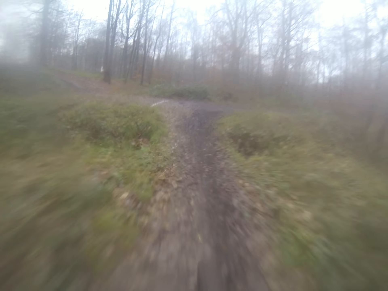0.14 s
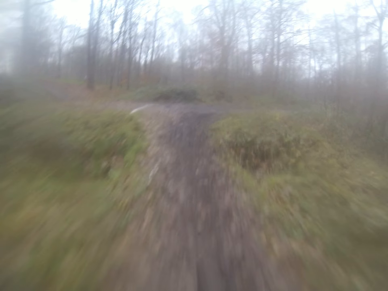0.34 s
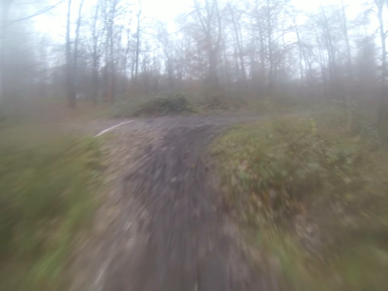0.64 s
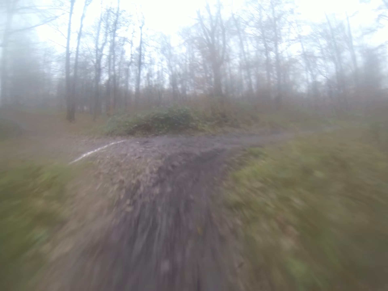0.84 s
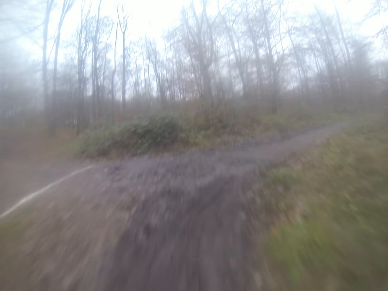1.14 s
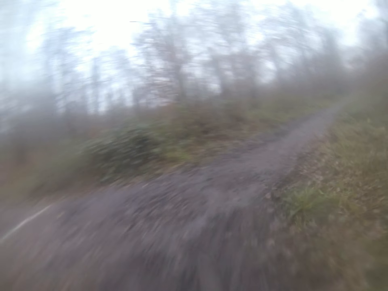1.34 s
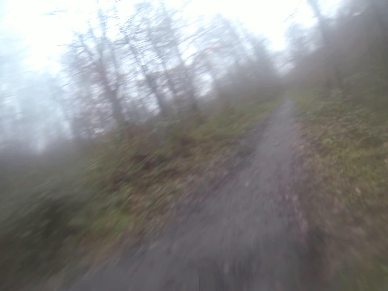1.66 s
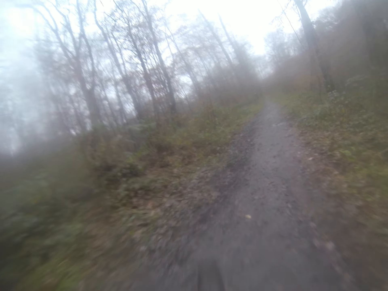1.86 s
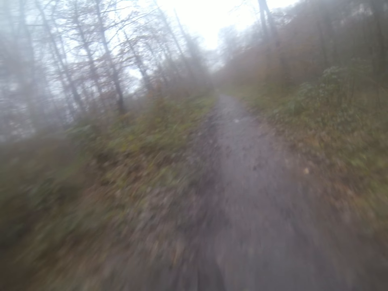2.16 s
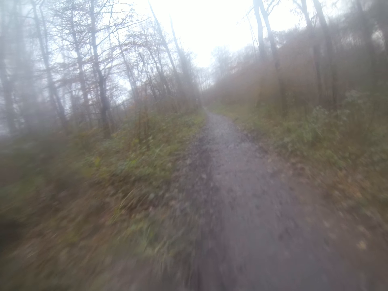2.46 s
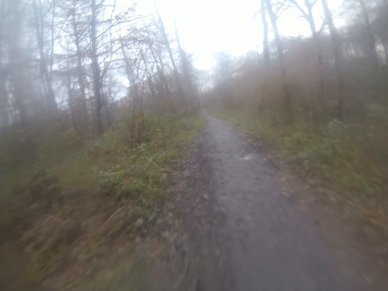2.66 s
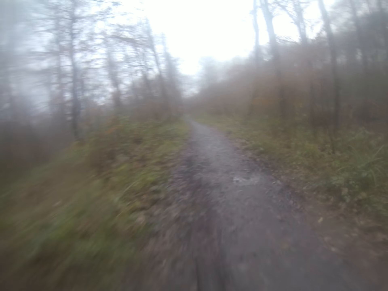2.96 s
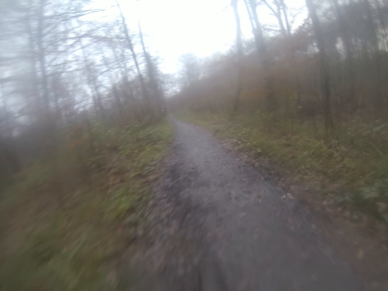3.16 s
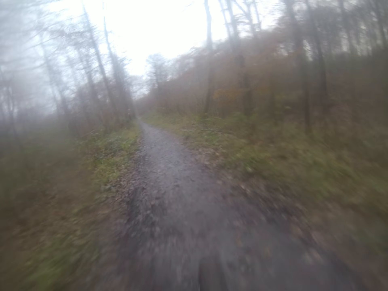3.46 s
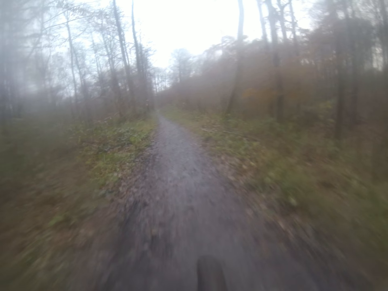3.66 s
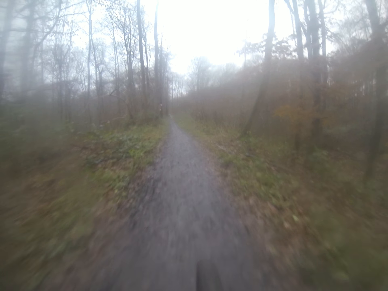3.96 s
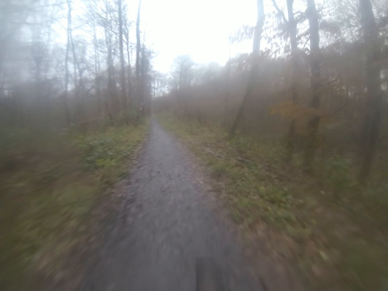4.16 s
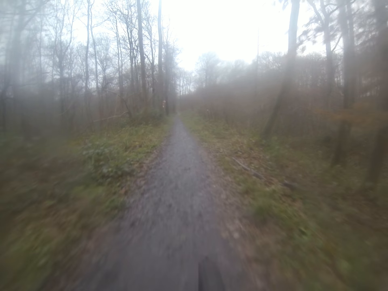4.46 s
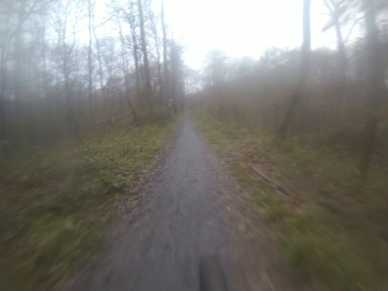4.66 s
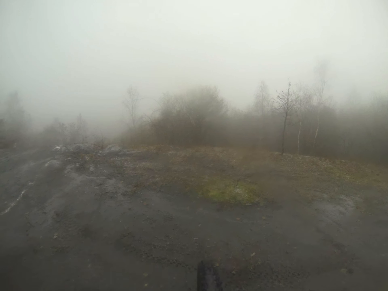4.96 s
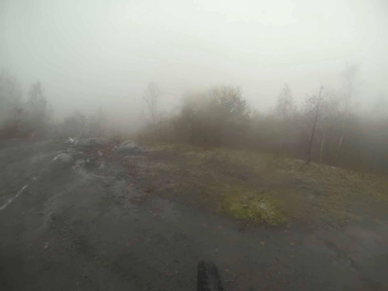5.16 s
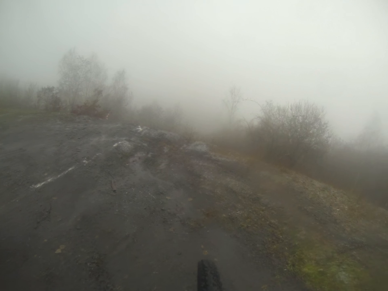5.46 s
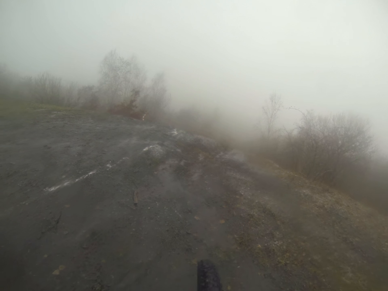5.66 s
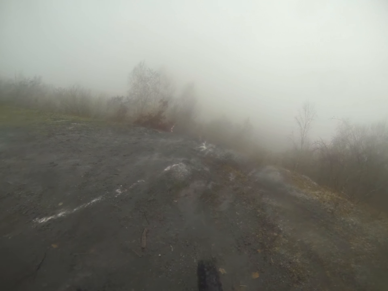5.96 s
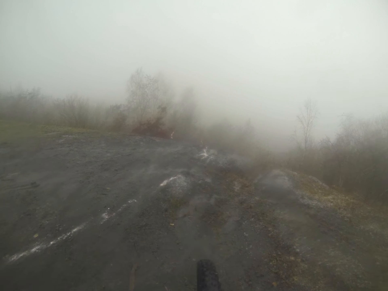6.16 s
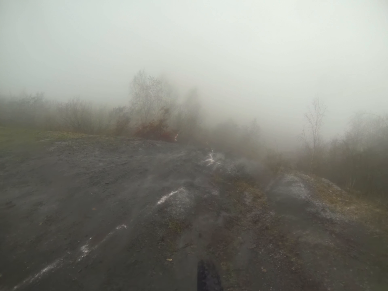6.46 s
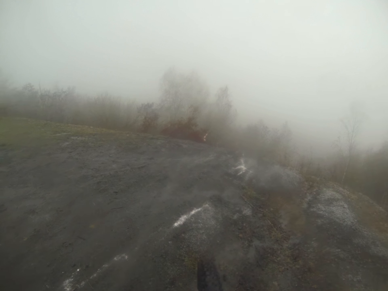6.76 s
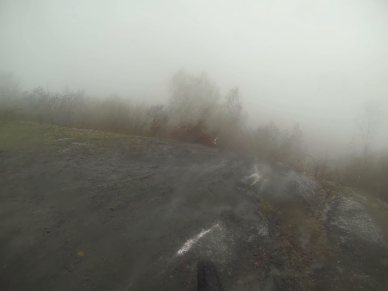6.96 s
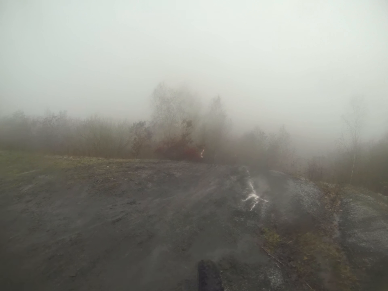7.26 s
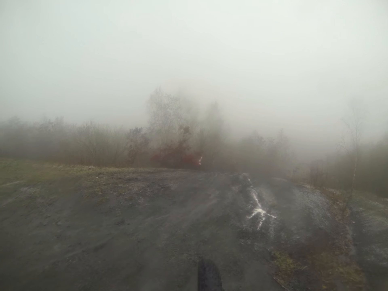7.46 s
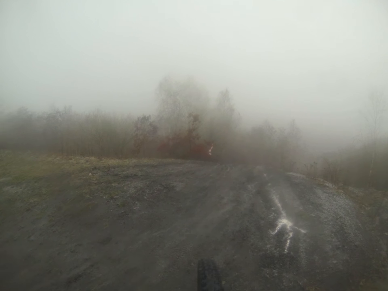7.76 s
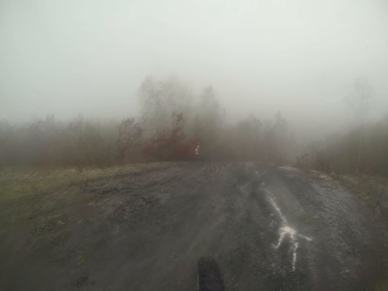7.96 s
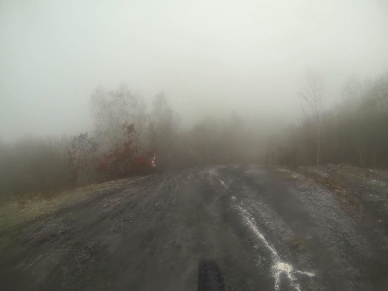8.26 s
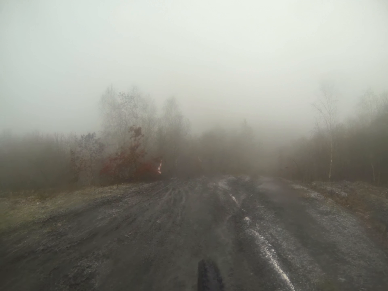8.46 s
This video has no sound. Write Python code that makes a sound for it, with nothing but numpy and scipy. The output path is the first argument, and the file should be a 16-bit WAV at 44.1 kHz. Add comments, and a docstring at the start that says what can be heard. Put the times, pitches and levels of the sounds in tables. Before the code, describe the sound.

The microphone sits in a case on a mountain bike, so everything is close, boxy and muffled. From 0 to 5 s, wind buffeting and ground shake make a thick, uneven low rumble that surges in dips and thins over crests. Irregular hollow thuds, chain clacks and tiny stone pings ride on it, over soft tyre crunch and ticking grit; a strong clack comes near 4.15 s. At 5.06 s there is a blink of silence, then from 5.1 to 5.5 s a loud wet disc brake squeal, harsh and rich in overtones, with a nearly steady, slightly wavering pitch and scrape beneath. From 5.5 s the rumble is weaker; short gliding tread hums come around 5.5-5.8 and 6.3-6.7 s, with pad hiss and stony crunch. Rumble grows again; hard clacks and ringing brake grazes cluster around 7.1-7.6 s, and rattling continues to 8.6 s.

```python
"""A mountain bike runs over a wet forest track, heard by a microphone in a case on the bike.
From the start wind and ground shake rumble as filtered noise; tyres crunch and flung grit ticks as
filtered impulses; bumps, chain clacks and stones ring damped case modes. At 5.06 s comes a blink of
silence, then a wet disc brake squeals as a stack of partials. From 5.45 s the pads hiss and graze
as noise and the tread hums as gliding tones, while the bike rattles on."""
import sys
import numpy as np
from scipy import signal
from scipy.fft import rfft, irfft, next_fast_len
from scipy.io import wavfile
from scipy.ndimage import uniform_filter1d, map_coordinates

SR = 44100
rng = np.random.default_rng(int(sys.argv[2]) if len(sys.argv) > 2 else 0)


def put_to_file(sound):
    """Save the sound as 16-bit audio at rate SR, in the file named by the first command-line argument."""
    columns = np.atleast_2d(sound).T  # one column per channel
    safe = np.clip(columns, -1, 1)
    whole_steps = np.round(safe * 32767)
    wavfile.write(sys.argv[1], SR, whole_steps.astype(np.int16))


N = 380141
TIME_S = np.arange(N) / SR
SILENCE_START_S, SILENCE_END_S = 5.062, 5.094


def amp(db):
    """Decibels to gain."""
    return 10 ** (np.asarray(db) / 20)


def unit(x):
    """x at rms 1."""
    return x / np.sqrt(np.mean(x ** 2) + 1e-20)


def curves(rows):
    """One value per sample for each column after the time."""
    knot_s, *columns = np.transpose(rows)
    return [np.interp(TIME_S, knot_s, column) for column in columns]


def during(rows):
    """1 while a curve lasts and 0 outside, with soft edges."""
    inside = (TIME_S > rows[0][0]) & (TIME_S < rows[-1][0])
    return uniform_filter1d(1.0 * inside, size=128)


def hump(middle_s, length_s):
    """A smooth rise from 0 to 1 and back."""
    return np.cos(np.pi * np.clip((TIME_S - middle_s) / length_s, -.5, .5)) ** 2


def swell(t, rise_s):
    """A rise to 1 at rise_s, then a decay."""
    return t / rise_s * np.exp(1 - t / rise_s)


def along(points, hz):
    """(Hz, value) points read on a log axis."""
    f, value = np.transpose(points)
    return np.interp(np.log(hz), np.log(f), value)


def wobble(rate_hz):
    """A smooth random curve, rate_hz knots a second."""
    knots = rng.standard_normal(int(N * rate_hz / SR) + 4)
    return map_coordinates(knots, [np.arange(N) * rate_hz / SR])


def coloured(x, spectrum):
    """x through a causal minimum-phase filter with the given (Hz, dB) points, at rms 1."""
    size = 2 * next_fast_len(N // 2 + 8192)
    hz, db = np.transpose(spectrum)
    log_bins = np.log(np.fft.rfftfreq(size, 1 / SR) + 1)
    gain = amp(np.interp(log_bins, np.log(hz), db))
    # folding the cepstrum onto positive time makes the filter causal
    cepstrum = irfft(np.log(gain))[:size // 2]
    cepstrum[0] /= 2
    response = np.exp(rfft(2 * cepstrum, size))
    return unit(irfft(rfft(x, size) * response)[:N])


def noise(spectrum):
    """Coloured noise of rms 1."""
    return coloured(rng.standard_normal(N), spectrum)


def steady(x, seconds):
    """x without its swells slower than the given time."""
    window = signal.windows.hann(int(seconds * SR) + 3)
    power = np.abs(signal.fftconvolve(x ** 2, window / window.sum(), "same"))
    return x / np.sqrt(power + 1e-6)


def grains(rate_hz, spread_db):
    """Random impulses of uneven size, rate_hz a second on average, at rms 1."""
    hit = rng.random(N) < rate_hz / SR
    size = amp(spread_db * np.minimum(rng.exponential(size=N), 4))
    return unit(hit * size * np.sign(rng.standard_normal(N)))


def ticks(rate_hz, range_db):
    """Sparse impulses whose sizes spread over range_db, small ones most common, at rms 1."""
    hit = rng.random(N) < rate_hz / SR
    size = amp(-range_db * np.sqrt(rng.random(N)))
    return unit(hit * size * np.sign(rng.standard_normal(N)))


# dips press the bike down (+), crests let it go light (-): middle t/s, length/s, load/dB
LOAD_SWINGS = [(0.192, .11, -9.5), (0.563, 0.072, 7), (1.263, .07, 12), (1.312, 0.17, -12),
               (1.753, 0.05, -13), (2.314, 0.086, 10), (2.529, 0.11, -10.5), (2.681, 0.036, 10.5),
               (2.797, 0.047, -1.5), (3.191, 0.062, 8.5), (3.261, 0.037, 9), (4.334, 0.1, 6.5),
               (6.755, 0.054, -4), (6.81, 0.098, 6), (7.267, 0.073, 7), (7.722, 0.2, -6.5),
               (8.403, 0.065, 7.5), (8.452, 0.15, -11)]
JOLT_DB, JOLT_S = 3, 0.037


def load():
    """Weight on the wheels in dB through dips, over crests and against bumps and stones."""
    swings_db = sum(db * hump(middle_s, length_s) for middle_s, length_s, db in LOAD_SWINGS)
    jolts = sum(hump(s, JOLT_S) for s, *_ in [*BUMPS, *STONES])
    return swings_db + JOLT_DB * (np.minimum(jolts, 1) - .1)


# wind on the case: t/s, base level/dB
WIND_LEVEL = [(0, -24), (.85, -17.5), (1.4, -24.5), (3.22, -23), (3.35, -36), (3.7, -20), (5.05, -25),
              (5.1, -34), (5.47, -30), (6.5, -20.5), (7.3, -15.5), (8.62, -15.5)]
# how hard the ground shakes the bike: t/s, base level/dB
GROUND_SHAKE = [(0, -16.5), (.7, -16), (1.1, -18.5), (2.3, -19), (2.75, -17.5), (3.0, -19), (3.26, -18.5),
                (3.33, -29), (3.5, -21.5), (3.74, -13.5), (4.15, -18), (5.01, -12), (5.06, -14.5),
                (5.1, -29), (5.47, -29.5), (5.6, -24.5), (6.15, -18), (7.4, -16.5), (7.75, -17.5),
                (8.62, -15)]
# wind rumble spectrum: f/Hz, relative level/dB
BUFFET_SPECTRUM = [(8, -17), (18, 12.5), (30, 9), (48, 9), (70, 1.5), (100, 2), (200, -73)]
# lower mount resonance: f/Hz, relative level/dB
BOOM_SPECTRUM = [(40, -15), (75, -10), (100, -2), (116, 3), (140, -6.5), (170, -20.5), (240, -32.5),
                 (500, -62.5), (2000, -110)]
# upper mount resonance: f/Hz, relative level/dB
DRONE_SPECTRUM = [(90, -34), (135, -1.5), (160, 0.5), (188, 1), (220, -8), (265, -15.5), (315, -18.5),
                  (370, -32.5), (460, -37.5), (900, -57.5), (2000, -100)]
WIND_DB_PER_LOAD_DB, BOOM_DB_PER_LOAD_DB, DRONE_DB_PER_LOAD_DB = .9, 1, 0.96
DRONE_DB_PER_SHAKE_DB = 1.175


def rumble(load_db):
    """Wind buffets the case while rough ground shakes it in the two resonances of its mount."""
    wind_db, = curves(WIND_LEVEL)
    shake_db, = curves(GROUND_SHAKE)
    shake_db = shake_db + 1.44 * wobble(22)
    buffet_db = wind_db + WIND_DB_PER_LOAD_DB * load_db + 2.5 * wobble(14) - 0.6
    boom_db = shake_db + BOOM_DB_PER_LOAD_DB * load_db + 1.7 * wobble(16) + 0.2
    drone_db = DRONE_DB_PER_SHAKE_DB * shake_db + DRONE_DB_PER_LOAD_DB * load_db
    drone_db = drone_db + 2.0 * wobble(24) - 4.0
    buffet = amp(buffet_db) * steady(noise(BUFFET_SPECTRUM), seconds=0.64)
    boom = amp(boom_db) * steady(noise(BOOM_SPECTRUM), seconds=0.22)
    drone = amp(drone_db) * steady(noise(DRONE_SPECTRUM), seconds=0.17)
    return buffet + boom + drone


# stones working under the tread: t/s, base level/dB
ROLL_LEVEL = [(0, -38.5), (.4, -51.5), (.75, -42.5), (1.1, -47.5), (2.5, -46), (3.4, -47), (3.65, -42.5),
              (4.4, -47.5), (4.85, -42), (5.1, -51.5), (5.85, -33.5), (6.55, -40), (7, -30), (7.25, -39.5),
              (8.62, -39)]
# low band of the tyre noise: f/Hz, relative level/dB
THRUM_SPECTRUM = [(250, -19.5), (430, -20), (560, -10.5), (660, -5.5), (730, 1.5), (790, -3.5), (900, -17),
                  (1100, -25.5), (1600, -23), (4000, -84)]
# middle band: f/Hz, relative level/dB
CRUNCH_SPECTRUM = [(600, -51.5), (1000, -17.5), (1250, -15), (1380, -2), (1465, 5.5), (1580, -2),
                   (1800, -5.5), (2050, -29), (2500, -24), (3500, -53), (8000, -88)]
# high band: f/Hz, relative level/dB
GRIT_SPECTRUM = [(1500, -19), (2600, -14.5), (3000, -2.5), (3300, 1.5), (3750, -11), (4200, -4.5),
                 (5000, -15.5), (6000, -15), (6800, -37), (7500, -16), (8600, -33.5), (9700, -24.5),
                 (11000, -40), (16000, -54)]


def tyres(load_db):
    """Many small stones under the tread excite the case; crunch grows fastest as they work harder."""
    roll_db, = curves(ROLL_LEVEL)
    # uneven ground moves all bands together, more on the stony track than on the hard slope
    uneven_db = np.where(TIME_S < SILENCE_START_S, 3, 1.5)
    ground_db = uneven_db * wobble(35) + 0.47 * load_db
    thrum = steady(coloured(grains(1500, spread_db=5.0), THRUM_SPECTRUM), seconds=0.57)
    crunch = steady(coloured(grains(4000, spread_db=7.0), CRUNCH_SPECTRUM), seconds=0.18)
    grit = coloured(grains(7000, spread_db=5.0), GRIT_SPECTRUM)
    thrum = amp(roll_db + ground_db + 2.5) * thrum
    crunch = amp(1.463 * roll_db + ground_db + 18) * crunch
    grit = amp(roll_db + 0.68 * ground_db - 19.5) * grit
    return thrum + crunch + grit


# loose grit, scarce on the hard slope: t/s, base level/dB
LOOSE_GRIT = [(0, -56), (3.6, -58.5), (5, -53.5), (5.6, -70.5), (7.1, -77), (7.35, -52), (8.3, -51.5),
              (8.62, -67)]
# sharp grains, also cracks of blows and stones: f/Hz, relative level/dB
SPRAY_SPECTRUM = [(900, -11.5), (1600, 15), (2500, 1.5), (3300, -2), (5000, -4.5), (6500, -13.5),
                  (7600, -7.5), (8700, -17.5), (9800, -13), (11500, -24.5), (16000, -39.5)]
# soft splats of mud: f/Hz, relative level/dB
MUD_SPECTRUM = [(400, -22), (750, 8.5), (1100, 6), (1600, -5.5), (2100, -2.5), (2600, -15.5), (3300, -4.5),
                (4500, -23), (6500, -25.5), (7600, -23), (10000, -31), (14000, -38.5)]
FLURRY_DB = 2.5


def spray(load_db):
    """Flung grit ticks on the bike in flurries: sharp grains, and soft mud in brief noise bursts."""
    loose_db, = curves(LOOSE_GRIT)
    loose_db = loose_db + 0.99 * load_db + FLURRY_DB * wobble(8)
    sharp = coloured(ticks(60, range_db=22), SPRAY_SPECTRUM)
    burst = signal.windows.hann(SR // 130)
    splats = signal.fftconvolve(np.abs(ticks(60, range_db=22)), burst)[:N]
    mud = coloured(splats * rng.standard_normal(N), MUD_SPECTRUM)
    return amp(loose_db - 4.5) * sharp + amp(loose_db + 5.5) * mud


# case modes rung by a blow: nominal f/Hz, rise/s, relative level/dB
CASE_MODES = [(260, 0.0055, -0.5), (739.7, 0.0042, 2.5), (1509, 0.0022, -0.5), (1610, 0.0056, -9),
              (3127, 0.0014, -4.5), (4500, 0.0022, -11.5), (7960, 0.0018, -14.5)]
# share of its hardness that a blow adds: f/Hz, share
HARDNESS_SHARE = [(740, 0.091), (1500, 0), (3100, 1), (7600, 1)]
# a hard slap: f/Hz, relative level/dB
SLAP_SPECTRUM = [(500, -17), (1100, 6), (1600, -0.5), (2200, 1), (2700, -8), (3300, 4), (3900, -19.5),
                 (6000, -24.5), (9000, -46), (14000, -49.5)]


def knocks(blows, force):
    """Each blow swells and dies in damped case modes, with a slap and a crack that grow with hardness."""
    out, slaps, cracks = np.zeros((3, N + SR))
    t = np.arange(SR // 20) / SR
    chances = rng.standard_normal((len(blows), len(CASE_MODES), 2))
    for (start_s, peak_db, hard_db), chance in zip(blows, chances):
        def drive_db(hz):
            return peak_db + along(force, hz) + hard_db * along(HARDNESS_SHARE, hz)

        start = round(start_s * SR)
        at = slice(start, start + len(t))
        for (hz, rise_s, mode_db), (detune, phase) in zip(CASE_MODES, chance):
            angle = 2 * np.pi * hz * (1 + 0.028 * detune) * t + np.pi * phase
            out[at] += amp(drive_db(hz) + mode_db) * swell(t, rise_s) ** 3 * np.sin(angle)
        slaps[at] += amp(drive_db(hz=2980) - 7.5) * swell(t, rise_s=0.0015)
        cracks[at] += amp(drive_db(hz=7640) + 6.0) * swell(t, rise_s=0.0015)
    return out[:N] + slaps[:N] * noise(SLAP_SPECTRUM) + cracks[:N] * noise(SPRAY_SPECTRUM)


SHUDDER_S, SHUDDER_DB = 0.027, -16.5  # length, level relative to the blow's force


def shudder(blows, force):
    """Around each blow the tyres and loose parts stir the case for a moment."""
    def swells(hz):
        return sum(amp(peak_db + along(force, hz) + SHUDDER_DB) * hump(s + SHUDDER_S / 8, SHUDDER_S)
                   for s, peak_db, _ in blows)

    return swells(hz=740) * noise(THRUM_SPECTRUM) + swells(hz=1530) * noise(CRUNCH_SPECTRUM)


# wheels hit roots and ruts: t/s, drive level/dB, hardness/dB
BUMPS = [(.0906, -25, 9), (.295, -23, 9), (.3679, -35, 17.5), (.3788, -23, 0.5), (.504, -32.5, 5),
         (.571, -26.5, -2.5), (.757, -25.5, -3), (.7829, -23, 5), (.957, -31, 14.5), (1.1278, -25, -4),
         (1.176, -21.5, 5.5), (1.3902, -23, -27), (1.4272, -21, -1), (1.442, -29.5, 6.5), (1.5709, -29, -1),
         (1.9366, -22.5, 6), (2.1469, -26, -13), (2.313, -20.5, -5.5), (2.662, -22.5, 4),
         (2.7428, -23, -24), (2.9816, -25.5, -4.5), (3.066, -24, -5), (3.2538, -16, -8), (3.286, -30, -8.5),
         (3.5543, -20.5, -5), (3.8778, -19, 6.5), (4.1496, -20, 8), (4.2174, -24, -7), (4.2415, -20.5, -7),
         (4.2938, -24, -10), (4.445, -25, -9), (4.72, -19.5, 2), (4.9714, -21, 1), (7.0803, -16, -5),
         (7.3748, -15.5, 3.5), (7.7223, -17.5, -9.5)]
# force spectrum of a bump: f/Hz, relative level/dB
BUMP_SPECTRUM = [(240, -11), (740, 0.5), (1500, -8.5), (3100, -22.5), (7600, -31)]


def bumps():
    """Wheels thud on roots and ruts, strongest in the case mode near 740 Hz."""
    return knocks(BUMPS, BUMP_SPECTRUM) + shudder(BUMPS, BUMP_SPECTRUM)


# chain and frame clack: t/s, drive level/dB, hardness/dB
CLACKS = [(.1476, -20.5, 12.5), (1.5487, -29.5, 19), (1.6958, -13.5, 1), (2.293, -24.5, 4.5),
          (2.6234, -24.5, 18), (2.8677, -12, -16), (2.9816, -24.5, -11.5), (3.0182, -16, -9.5),
          (3.6237, -24, -6), (4.1496, -13.5, 15.5), (4.802, -27.5, -14), (4.856, -28.5, -5.5),
          (5.7071, -19, -8), (6.8428, -16.5, -9), (7.0793, -9, 8), (7.1535, -25, 19), (7.3738, -20.5, 18),
          (7.4214, -12.5, -8), (7.5236, -13.5, 4.5), (7.5387, -12, -12), (7.5665, -17, 6),
          (7.6136, -16.5, -20), (8.001, -11, 2), (8.1745, -20.5, -4), (8.2413, -11.5, 4),
          (8.3051, -23, 9.5), (8.3622, -12.5, -24)]
# force spectrum of a clack: f/Hz, relative level/dB
CLACK_SPECTRUM = [(240, -8.5), (740, -11.5), (1500, 0), (3100, -15), (7600, -37)]


def clacks():
    """Chain and frame clack through the case, with force centred near 1500 Hz."""
    return knocks(CLACKS, CLACK_SPECTRUM) + shudder(CLACKS, CLACK_SPECTRUM)


# single stones flung against the frame: t/s, drive level/dB, ping f/Hz
STONES = [(0.1482, -26.5, 4500), (0.504, -43, 4300), (0.818, -39, 3970), (0.8829, -42.5, 4130),
          (0.9566, -40, 4640), (1.2668, -36, 4400), (1.709, -34.5, 4300), (1.9935, -40, 4000),
          (2.0667, -39, 4000), (2.389, -37.5, 4200), (2.6223, -38.5, 4070), (3.2522, -47, 4060),
          (3.879, -37.5, 4140), (3.9534, -36, 4230), (4.15, -22.5, 4100), (4.322, -42.5, 5000),
          (4.7671, -41.5, 4160), (5.5373, -43, 4330), (5.7094, -35.5, 7500), (7.152, -28, 5330),
          (7.3721, -36, 4330), (8.3638, -28, 4130)]
STONE_RISE_S, STONE_BODY_HZ = .0011, 3190


def stones():
    """A stone strikes the frame: a tiny ping of its own pitch, a ring of the case and a crack."""
    pings, cracks = np.zeros((2, N + SR))
    t = np.arange(SR // 50) / SR
    envelope = swell(t, STONE_RISE_S)
    body = np.sin(2 * np.pi * STONE_BODY_HZ * t)
    for start_s, db, hz in STONES:
        start = round(start_s * SR)
        at = slice(start, start + len(t))
        ping = np.sin(2 * np.pi * hz * t)
        pings[at] += envelope ** 3 * (amp(db - 5.5) * ping + amp(db - 6) * body)
        cracks[at] += amp(db) * envelope
    return pings[:N] + cracks[:N] * noise(SPRAY_SPECTRUM)


BEAT_MIN_HZ, BEAT_MAX_HZ = 5, 13


def beating():
    """A slow swing of about unit size at a random rate, with a little flutter on it."""
    rate, start = rng.random(2)
    hz = BEAT_MIN_HZ + rate * (BEAT_MAX_HZ - BEAT_MIN_HZ)
    return 1.06 * np.sin(2 * np.pi * (hz * TIME_S + start)) + 0.43 * wobble(60)


# pitch sags under pressure, rises on release: t/s, mean f/Hz
SQUEAL_HZ = [(5.1, 562.6), (5.135, 563.9), (5.16, 565.9), (5.2, 560.8), (5.228, 559.1), (5.28, 561.8),
             (5.345, 560.8), (5.365, 558.6), (5.42, 559.4), (5.46, 566.6), (5.5, 569)]
# stick-slip strength: t/s, level/dB
SLIP_LEVEL = [(5.095, -7.5), (5.103, 3), (5.135, -3), (5.2, -2), (5.23, 0), (5.345, 0.5), (5.365, -3),
              (5.435, -5.5), (5.512, -25.5)]
# third partial: t/s, level before flutter/dB
THIRD_PARTIAL = [(5.1, -16.5), (5.165, -13.5), (5.215, -28), (5.228, -40), (5.24, -24.5), (5.275, -16),
                 (5.345, -16.5), (5.37, -25), (5.42, -22), (5.465, -15.5), (5.512, -33)]
# other partials: multiple of pitch, base level/dB, gain per slip/(dB/dB), beating depth/dB
SQUEAL_PARTIALS = [(1, -34.5, 0, 5), (2, -12.5, 1, -0.1), (4, -27, 1.6, -2.5), (5, -34.5, 1.3, 4),
                   (6, -24.5, 1.3, -0.6), (7, -45.5, 0.3, 8.5), (8, -41, 0.6, 5), (9, -51, 0.5, 0.5),
                   (10, -54.5, 1.2, 4), (11, -48.5, 1.5, -4), (12, -60.5, 2.3, 7), (13, -55.5, .8, 4),
                   (14, -59, 2, 5.5)]
# scrape under the squeal: f/Hz, relative level/dB
SCRAPE_SPECTRUM = [(400, -6), (720, -5.5), (950, -12), (1450, 9.5), (2050, -12), (3200, -3), (3900, -14.5),
                   (6300, -16.5), (9000, -23), (13000, -32), (15500, -50.5)]


def squeal():
    """Wet pads stick and slip on the disc: harmonic partials that trade strength, over a scrape."""
    hz, = curves(SQUEAL_HZ)
    slip_db, = curves(SLIP_LEVEL)
    third_db, = curves(THIRD_PARTIAL)
    phase = 2 * np.pi * np.cumsum(hz * (1 + .0015 * wobble(500))) / SR
    partials = [(k, db + growth * slip_db + beat_db * beating())
                for k, db, growth, beat_db in SQUEAL_PARTIALS]
    partials += [(3, third_db)]
    # the sharp slip leaves a long, slowly falling series on top
    top_db = 1.5 * slip_db - 64.5
    partials += [(k, top_db - .9 * (k - 15) + 3 * wobble(40)) for k in range(15, 28)]
    gate = during(SLIP_LEVEL)
    on = gate > 1e-6
    tone = np.zeros(N)
    for k, db in partials:
        start_phase = 2 * np.pi * rng.random()
        tone[on] += amp(db[on]) * np.sqrt(2) * np.sin(round(k) * phase[on] + start_phase)
    scrape = amp(0.62 * slip_db - 40.0) * noise(SCRAPE_SPECTRUM)
    flutter = amp(0.93 * wobble(140))
    return gate * (tone * flutter + scrape)


# long pull on the brake after the squeal: t/s, base level/dB
BRAKE_PULL = [(5.45, -75), (5.62, -40), (5.78, -65), (5.87, -34.5), (6.05, -38.5), (6.35, -41),
              (6.7, -37.5), (6.9, -33), (7.07, -34.5), (7.11, -69)]
# pads graze the disc: middle t/s, length/s, base level/dB
PAD_GRAZES = [(5.685, 0.14, -29), (5.818, 0.28, -24), (6.927, .12, -25.5), (7.063, 0.11, -18.5),
              (7.133, 0.039, -20.5), (7.23, 0.043, -24), (7.338, 0.19, -27.5), (7.547, 0.11, -17),
              (7.623, 0.087, -22.5), (7.762, 0.12, -26), (8.06, 0.055, -28), (8.294, 0.22, -30),
              (8.507, 0.23, -30)]
# pad hiss: f/Hz, relative level/dB
PAD_SPECTRUM = [(300, -13), (700, 5), (1100, 1.5), (1750, 6.5), (2100, -7), (2600, -25), (3150, -5.5),
                (3750, -31), (4300, -18), (5400, -24.5), (6200, -33), (7000, -41), (14000, -73)]
# modes of the lightly rubbed disc: f/Hz, relative level/dB
DISC_SPECTRUM = [(900, -32.5), (1280, -17.5), (1390, 0.5), (1430, 7), (1455, -3), (1490, 6.5), (1570, -18),
                 (1900, -24.5), (2600, -34.5), (3250, -20.5), (3700, -68), (4130, -27), (4500, -59.5),
                 (7100, -60.5), (7850, -43), (8700, -70.5), (11500, -63.5), (15000, -77.5)]


def brake():
    """Once the water is wiped off, pads hiss on the disc; light grazes ring its modes unsteadily."""
    pull_db, = curves(BRAKE_PULL)
    pull = during(BRAKE_PULL) * amp(pull_db)
    graze = sum(amp(db) * hump(middle_s, length_s) for middle_s, length_s, db in PAD_GRAZES)
    hiss = (pull + amp(-16) * graze) * amp(2.0 * wobble(28)) * noise(PAD_SPECTRUM)
    ring = (amp(-3) * graze + amp(-9.5) * pull) * steady(noise(DISC_SPECTRUM), seconds=0.18)
    return hiss + ring


# tread on patches of hard ground: start t/s, length/s, first mean f/Hz, last mean f/Hz, level/dB
TREAD_HUMS = [(5.46, 0.13, 556, 539, -31.5), (5.526, 0.143, 555, 624, -33.5), (5.625, .2, 613, 688, -37),
              (6.252, 0.11, 565, 542, -41), (6.467, 0.16, 549, 600, -36.5), (6.555, .17, 607, 644, -38.5)]


def tread():
    """Tyre knobs drum on hard ground in short, wavering, gliding hums."""
    out = np.zeros(N)
    for start_s, length_s, first_hz, last_hz, db in TREAD_HUMS:
        glide_hz = np.interp(TIME_S, [start_s, start_s + length_s], [first_hz, last_hz])
        hz = glide_hz * (1 + 0.015 * wobble(90))
        envelope = np.sqrt(2 * hump(start_s + length_s / 2, length_s))
        out += amp(db) * envelope * np.sin(2 * np.pi * np.cumsum(hz) / SR)
    return out


def scene():
    """All sources add up at one microphone in the case."""
    load_db = load()
    rolling = rumble(load_db) + tyres(load_db) + spray(load_db)
    rattle = bumps() + clacks() + stones()
    braking = squeal() + brake()
    return (rolling + rattle + braking + tread())[None]


TOP_HZ = 15800


def record(dry):
    """The sound drops out for a blink; peaks round off at full scale and the top band is cut."""
    live = (TIME_S < SILENCE_START_S) | (TIME_S > SILENCE_END_S)
    live = uniform_filter1d(1.0 * live, size=24)
    rounded = live * dry / (1 + np.abs(dry) ** 8) ** (1 / 8)
    keep = np.fft.rfftfreq(N, 1 / SR) < TOP_HZ
    return irfft(rfft(rounded) * keep, N)


dry = scene()
out = record(dry)
put_to_file(out)
```